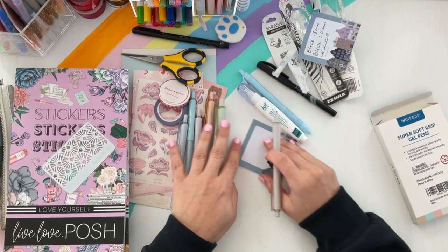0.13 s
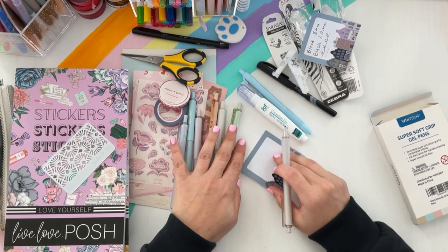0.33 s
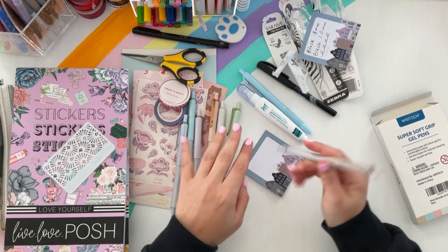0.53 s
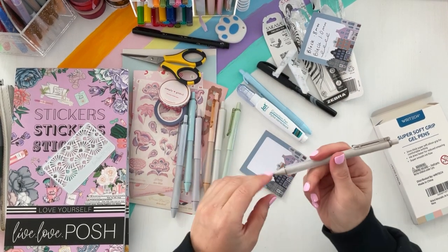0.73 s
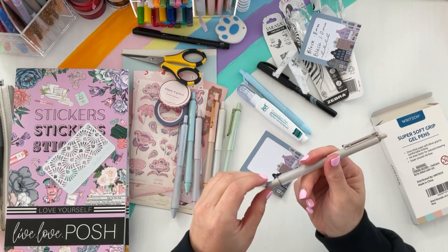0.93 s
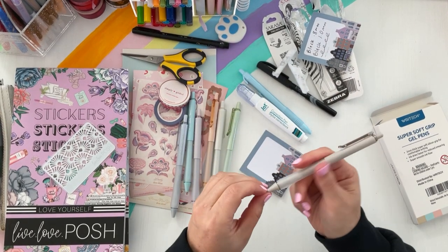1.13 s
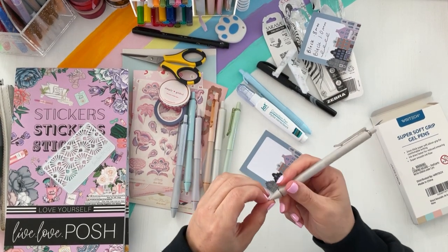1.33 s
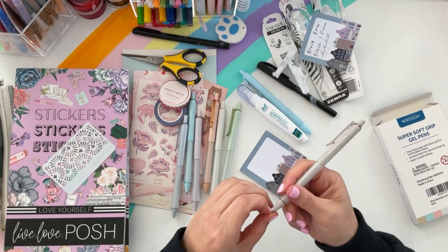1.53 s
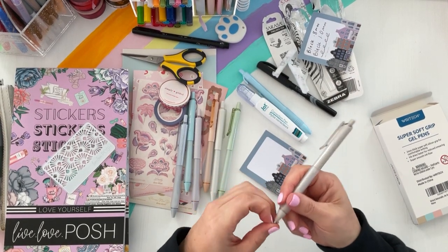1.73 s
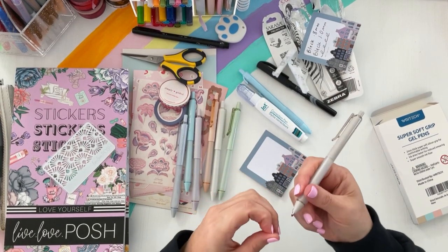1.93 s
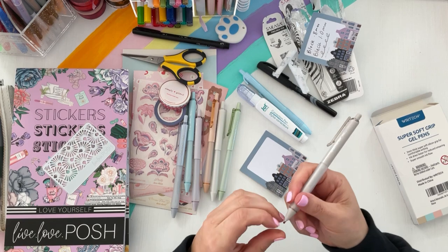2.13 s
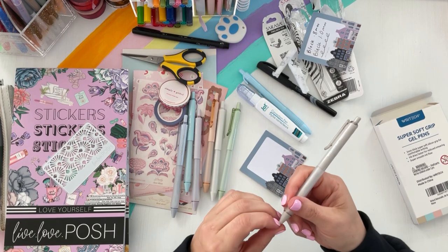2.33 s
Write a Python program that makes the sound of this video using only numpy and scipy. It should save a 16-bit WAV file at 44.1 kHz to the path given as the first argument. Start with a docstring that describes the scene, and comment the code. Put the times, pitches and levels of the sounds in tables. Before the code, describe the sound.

A plastic pen knocks hard on a tabletop with a quick rattle, then faint fingernail ticks

```python
"""Pen knocked on a tabletop

A plastic gel pen slides off a notepad, rattles and knocks hard on the tabletop: contact pulses ring table modes.
A hand brushes over paper (grainy shaped noise) and bumps softly (low noise swells).
Fingernails pick at the pen's tip: tiny snaps with dying rasps, coloured by barrel resonances.
A small, quiet room with a low hum rings briefly after the knock: banded decaying noise."""
import sys
import numpy as np
from scipy import signal
from scipy.fft import rfft, irfft
from scipy.io import wavfile

SR = 44100
rng = np.random.default_rng(int(sys.argv[2]) if len(sys.argv) > 2 else 0)


def put_to_file(sound):
    """Save the sound as 16-bit audio at rate SR, in the file named by the first command-line argument."""
    columns = np.atleast_2d(sound).T  # one column per channel
    safe = np.clip(columns, -1, 1)
    whole_steps = np.round(safe * 32767)
    wavfile.write(sys.argv[1], SR, whole_steps.astype(np.int16))


N = 105840
T_S = np.arange(N) / SR

# room air: f/Hz, relative density/dB per Hz
AIR_COLOUR = [(15, -46.5), (25, -15.5), (53, -3), (99, -2.5), (130, 1.5), (175, -6), (285, -8), (354, -0.5),
              (439, -9.5), (659, -15.5), (3720, -22), (4610, -19), (8360, -22.5), (13600, -24),
              (16000, -31.5)]
# hum partials: f/Hz, level/dB, width of first resonance/Hz
HUM_PARTIALS = [(78.15, -79.5, 12), (119, -79, 6), (245, -80.5, 20), (354.7, -77, 12), (603, -89, 10)]
AIR_DB = -70.5

# soft bumps of hands and wrists on the table: t/s, level/dB, f/Hz, length/s
HAND_BUMPS = [(.158, -50, 135, .026), (.69, -58, 128, .17), (1.595, -64.5, 241, 0.061),
              (1.7856, -59, 656, 0.0097), (1.795, -59.5, 103.2, .045), (2.161, -69, 316, 0.11),
              (2.3, -68, 89, .12), (2.307, -68, 297.6, 0.091)]
BUMP_SPREAD = 1.25  # band edges: f over and times this

# sliding strokes: start/s, attack/s, hold/s, release/s
BRUSH_TIMES_S = (0.582, 0.069, 0.011, 0.22)
SLIDE_TIMES_S = (-.02, .01, .3, .06)
# stroke colours: f/Hz, relative density/dB per Hz
BRUSH_COLOUR = [(100, 3.5), (400, 4.5), (650, -8), (1100, 0), (1800, -5), (3300, 1), (5000, 2.5),
                (9000, -4), (15000, -17)]
SLIDE_COLOUR = [(60, -17), (130, -8.5), (400, -7), (650, -15), (1200, -1), (1800, -9), (3000, -0.5),
                (5500, -5), (8000, -10), (15000, -13)]
BRUSH_DB, SLIDE_DB = -63, -51
GRAIN_DB, GRAIN_HZ = 2, 200  # rms depth and bandwidth of the level flutter
BRUSH_DULL_HZ, BRUSH_DULL_FADE_S = 6470, 0.12

# plastic clicks of clip, button and fingernail: t/s, level/dB, centre f/Hz, t60/s, relative band spread
PLASTIC_CLICKS = [(.0057, -30.5, 9600, 0.0095, 1.4), (0.0103, -31, 4400, 0.016, 1.3),
                  (0.1499, -20, 5740, 0.0082, 0.4), (0.1549, -30, 11400, 0.045, 2.8),
                  (0.165, -31.5, 5840, 0.028, 1.1), (0.183, -31, 10090, .009, 1.2),
                  (0.1854, -19, 6000, 0.019, 3), (0.2007, -5, 5200, 0.007, 2), (.2050, -19, 5497, .01, 1.6),
                  (.2192, -26.5, 4300, .012, 1.6), (.4719, -59, 4800, .015, 0.98),
                  (.829, -58, 3000, .02, 1), (1.1305, -45.5, 3800, .01, 0.7),
                  (1.1364, -42.5, 4600, .025, 1.22), (1.2737, -57.5, 9000, .015, 1.42),
                  (1.5172, -52, 2400, .012, 0.47), (1.517, -51, 5793, .035, 0.61),
                  (1.599, -56, 2300, 0.047, 0.56), (1.7675, -52.5, 2900, 0.0337, 1.38),
                  (1.772, -58, 3500, .025, 1.5), (1.7868, -44, 3900, 0.039, 1.8),
                  (1.7942, -33.5, 6440, 0.0057, 2.5), (1.799, -46.5, 5000, 0.019, 2),
                  (2.2476, -63, 6000, 0.0099, 1.73), (2.3088, -60, 5000, .02, 1.72)]
# resonances of the pen's barrel: f/Hz, width/Hz, relative level/dB
BARREL_MODES = [(2350, 120, 8), (4300, 400, 2), (4880, 450, 3), (5500, 500, 0), (6900, 600, -2.5),
                (8440, 1500, -2.5)]
CLICK_SPILL_DB, SNAP_DB = -22, 4  # full-band share; snap over rasp

# pen meets table: t/s, force/dB, contact brightness f/Hz
PEN_KNOCKS = [(0.1285, 16, 419), (0.136, 9.5, 523), (0.1496, 19, 510), (.2016, 22, 4000), (.2050, 10, 1712),
              (.2190, 11.5, 2403), (0.2237, 4, 1900), (0.2297, -2.5, 1688), (1.7871, -8, 652.4)]
# what pen and tabletop ring with: f/Hz, width/Hz, level/dB
RINGING_MODES = [(215, 20, -8.5), (275, 78, -10), (356.7, 90, -14.5), (505, 52, -11.5), (645, 140, -12),
                 (876, 62, -11), (1050, 80, -6), (1240, 43, -9.5), (1379, 18, -2.5), (1497, 200, -1.5),
                 (1978, 260, -1), (2191, 380, -1.5), (2210, 190, -8.5), (2690, 170, -14), (4390, 1200, -11)]
SCUFF_DB, SCUFF_T60_S = -27, 0.026  # a contact skids briefly after it lands
BENDING_TRAVEL_2KHZ_S = 0.001857  # to the table's edge; lower waves are slower
FASTEST_WAVE_HZ = 6470  # zero of the lag; waves above arrive together

# room response: f/Hz, level/dB, t60/s
ROOM_BANDS = [(100, -13, 0.41), (250, -13, 0.32), (568, -14, .33), (1050, -7, .45), (2108, -17, .34),
              (4500, -15, .34), (8000, -13, 0.24), (14000, -8, .29)]
ROOM_DELAY_S, ROOM_BUILD_S = 0.0035, 0.004
CUTOFF_HZ = 16000


def from_db(db):
    """Decibels to gain."""
    return 10 ** (np.asarray(db) / 20)


def rms_one(x):
    """Scale to unit rms."""
    return x / np.sqrt(np.mean(x ** 2) + 1e-20)


def decay(t_s, t60_s):
    """Exponential fall of 60 dB in t60."""
    return np.exp(-np.log(1000) * t_s / t60_s)


def at_hz(points, hz, axis=1):
    """Read a table column on a log-frequency axis."""
    points = np.array(points)
    return np.interp(np.log(hz + 1), np.log(points[:, 0]), points[:, axis])


def resonate(x, hz, width_hz):
    """Two-pole resonance, about unit gain at its peak."""
    r = np.exp(-np.pi * width_hz / SR)
    numerator = np.array([1, 0, -1]) * (1 - r * r) / 2
    denominator = [1, -2 * r * np.cos(2 * np.pi * hz / SR), r * r]
    return signal.lfilter(numerator, denominator, x + 1e-18)


def butter(x, hz, kind, order=2):
    """Butterworth filter, corners kept inside the usable band."""
    corners_hz = np.clip(hz, 10, 0.47 * SR)
    sos = signal.butter(order, corners_hz, kind, fs=SR, output="sos")
    return signal.sosfilt(sos, x + 1e-18)


def noise(colour):
    """Noise of a given colour, unit rms."""
    hz = np.arange(N // 2 + 1) * SR / N
    spectrum = rfft(rng.standard_normal(N)) * from_db(at_hz(colour, hz))
    return rms_one(irfft(spectrum, N))


def add(out, t_s, sound):
    """Mix a sound in at a time."""
    i = max(int(t_s * SR), 0)
    out[i:i + len(sound)] += sound[:N - i]


def background():
    """Room air as coloured noise; a wavering low hum as noise through narrow resonances."""
    out = from_db(AIR_DB) * noise(AIR_COLOUR)
    for hz, db, width_hz in HUM_PARTIALS:
        white = rng.standard_normal(N + SR)
        partial = resonate(resonate(white, hz, width_hz), hz, 2 * width_hz)
        out += from_db(db) * rms_one(partial[SR:])  # skip the filters' build-up
    return out


def bumps():
    """Flesh on table and pen: brief swells of band-limited rumble."""
    out = np.zeros(N)
    for t_s, db, hz, length_s in HAND_BUMPS:
        count = int(length_s * SR)
        white = rng.standard_normal(SR // 2)
        rumble = butter(white, [hz / BUMP_SPREAD, hz * BUMP_SPREAD], "band")[-count:]
        swell = np.sqrt(np.hanning(count))
        add(out, t_s, from_db(db) * rms_one(rumble * swell))
    return out


def stroke(times_s, db, colour):
    """Friction on paper: grainy hiss that swells, holds and fades."""
    start, attack, hold, release = times_s
    envelope = np.interp(T_S, start + np.cumsum([0, attack, hold, release]), [0, 1, 1, 0])
    grain = rms_one(butter(rng.standard_normal(N), GRAIN_HZ, "low"))
    return envelope * from_db(db + GRAIN_DB * grain) * noise(colour)


def hand_brush():
    """A palm sweeps off the paper; as it slows, its hiss crossfades to a duller one."""
    hiss = stroke(BRUSH_TIMES_S, BRUSH_DB, BRUSH_COLOUR)
    dull = butter(hiss, BRUSH_DULL_HZ, "low", order=1)
    full_s = BRUSH_TIMES_S[0] + BRUSH_TIMES_S[1]
    top = np.clip(1 - (T_S - full_s) / BRUSH_DULL_FADE_S, 0, 1)
    return top * hiss + (1 - top) * dull


def pen_slide():
    """The pen drags off the notepad: friction hiss."""
    return stroke(SLIDE_TIMES_S, SLIDE_DB, SLIDE_COLOUR)


def clicks():
    """Plastic contacts: a snap and a tiny dying rasp, band-shaped, then coloured by the barrel."""
    out, t_s = np.zeros(N), T_S[:SR // 16]
    for start_s, db, hz, t60_s, width in PLASTIC_CLICKS:
        signs = rng.choice([-1, 1], len(t_s))
        snap = from_db(SNAP_DB) * signal.unit_impulse(len(t_s))
        click = snap + signs * decay(t_s, t60_s)
        spread = 1 + max(width, 0.1) / 2
        band = butter(click, [hz / spread, hz * spread], "band")
        add(out, start_s, from_db(db) * (band + from_db(CLICK_SPILL_DB) * click))
    out = butter(out, 1300, "high")
    barrel = sum(from_db(db) * resonate(out, hz, width_hz) for hz, width_hz, db in BARREL_MODES)
    return 0.5 * (out + barrel)


def bending_delay(x):
    """Dispersion in the board: bending waves lag as 1/sqrt(f), so the bass arrives late."""
    hz = np.maximum(np.arange(N + 1) * SR / (2 * N), 60)
    slowness = np.sqrt(2000 / hz) - np.sqrt(2000 / FASTEST_WAVE_HZ)
    lag_s = BENDING_TRAVEL_2KHZ_S * np.maximum(slowness, 0)
    phase = np.pi * np.cumsum(lag_s) * SR / N  # integral of group delay
    return irfft(rfft(x, 2 * N) * np.exp(-1j * phase))[:N]


def knocks():
    """Contacts land, skid and ring the table's modes; duller contacts drive the high modes less."""
    force, t_s = np.zeros(N), T_S[:SR // 25]
    for start_s, db, bright_hz in PEN_KNOCKS:
        skid = rng.standard_normal(len(t_s)) * decay(t_s, SCUFF_T60_S)
        contact = signal.unit_impulse(len(t_s)) + from_db(SCUFF_DB) * skid
        add(force, start_s, from_db(db) * butter(contact, bright_hz, "low"))
    ringing = sum(from_db(db) * resonate(force, hz, width_hz) for hz, width_hz, db in RINGING_MODES)
    return bending_delay(butter(ringing, 155, "high"))


def room(x):
    """Diffuse reflections that build up quickly and die band by band."""
    t_s, edges_hz = T_S[:SR * 2 // 3], np.geomspace(70, 17000, 15)
    build = 1 - np.exp(-np.maximum(t_s - ROOM_DELAY_S, 0) / ROOM_BUILD_S)
    tail = np.zeros(len(t_s))
    for low, high in zip(edges_hz, edges_hz[1:]):
        hz = np.sqrt(low * high)
        band = butter(rng.standard_normal(len(t_s)), [low, high], "band")
        band = band * build * decay(t_s, at_hz(ROOM_BANDS, hz, axis=2))
        flat = np.sqrt(2 * (high - low) / SR / np.sum(band ** 2))  # energy in proportion to bandwidth
        tail += from_db(at_hz(ROOM_BANDS, hz)) * band * flat
    return signal.fftconvolve(x, tail)[:N]


def scene(count=3):
    """Pen and hands on the table; the pen radiates a little differently towards each wall."""
    pen = knocks() + clicks()
    reflections = sum(room(knocks() + clicks()) for _ in range(count)) / np.sqrt(count)
    hands = hand_brush() + bumps()
    return (background() + hands + pen_slide() + reflections + pen)[None]


def record(dry):
    """The microphone thins the deep bass; a steep elliptic filter cuts the top."""
    thin = butter(dry, 58, "high", order=4)
    sos = signal.ellip(10, 0.1, 70, CUTOFF_HZ, fs=SR, output="sos")
    return signal.sosfilt(sos, thin)


dry = scene()
out = record(dry)
put_to_file(out)
```